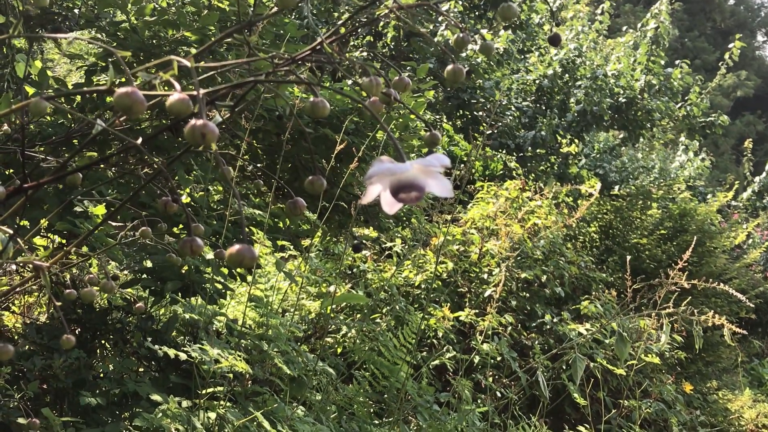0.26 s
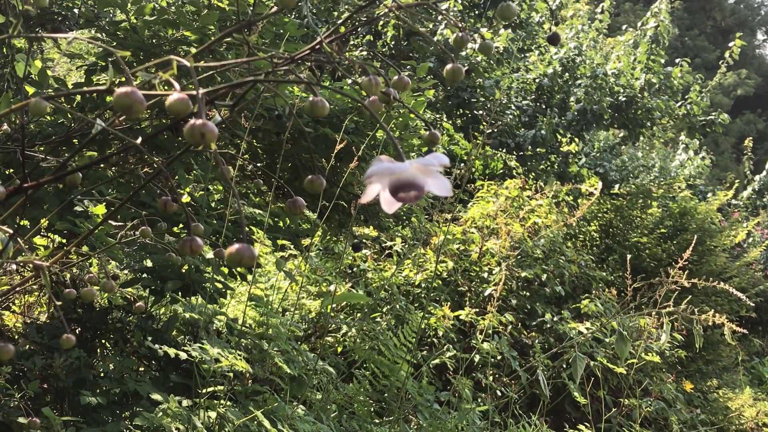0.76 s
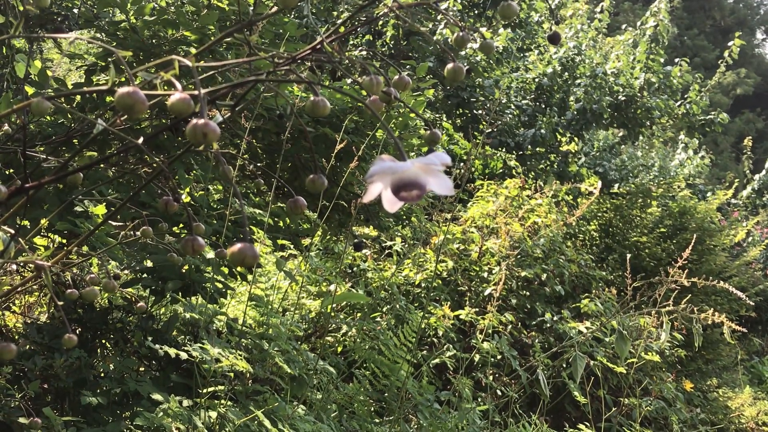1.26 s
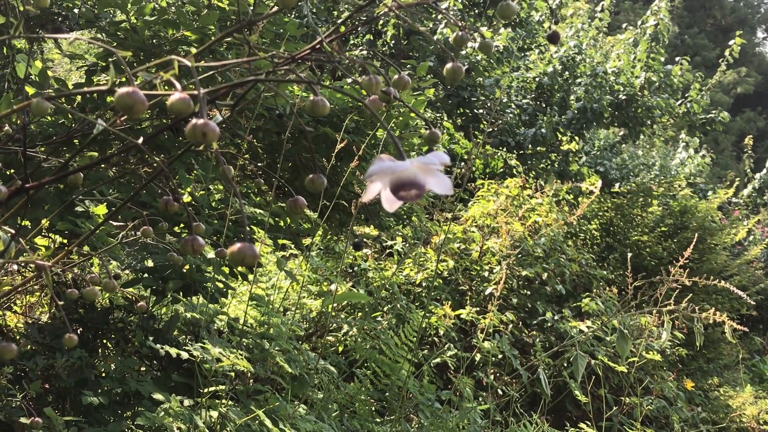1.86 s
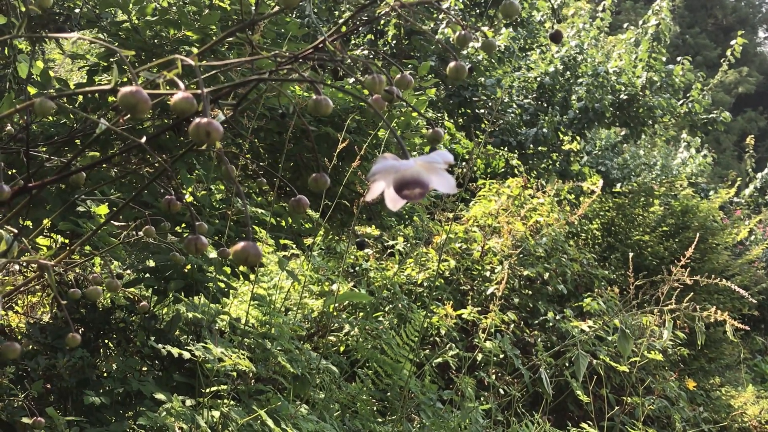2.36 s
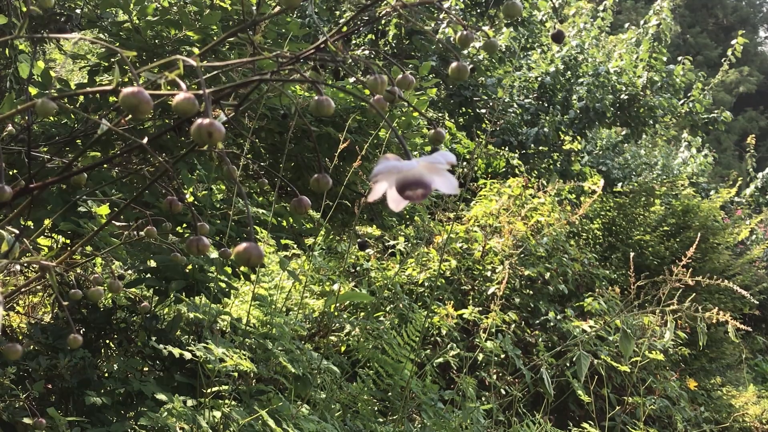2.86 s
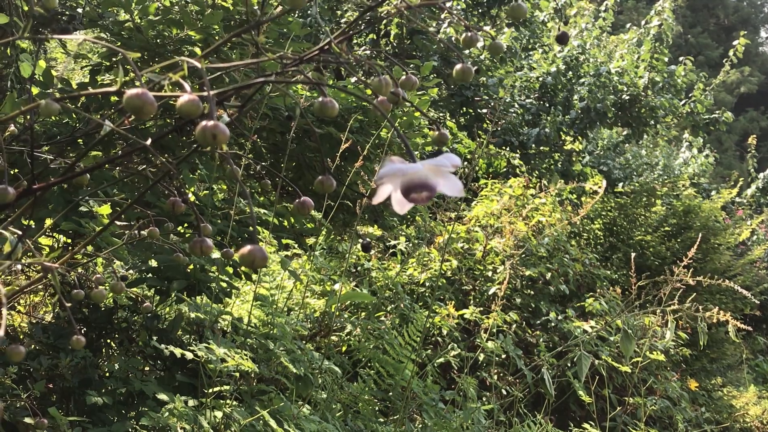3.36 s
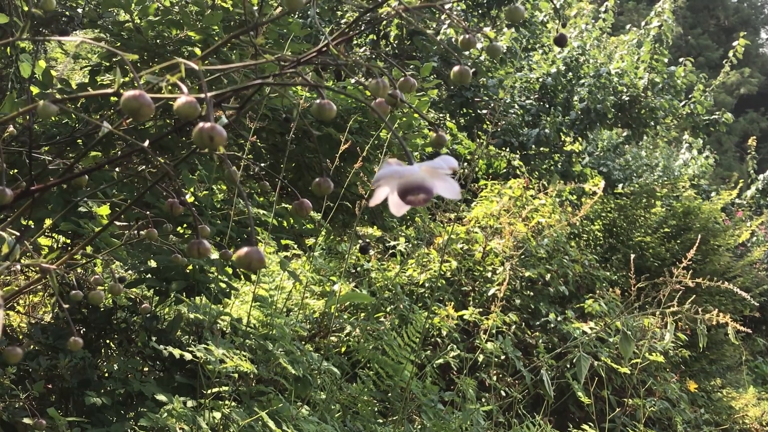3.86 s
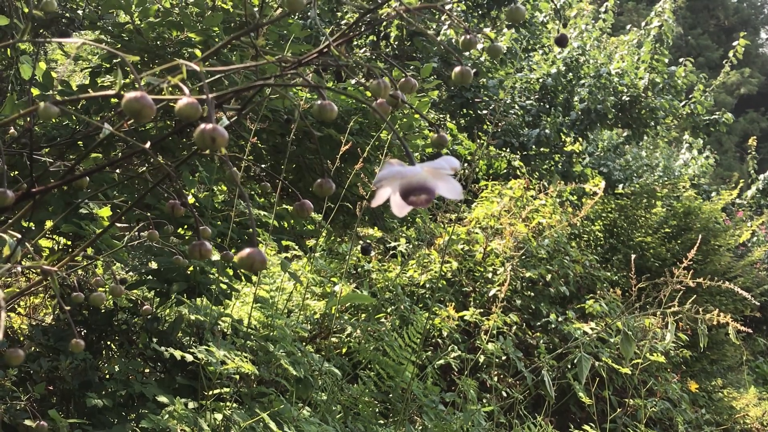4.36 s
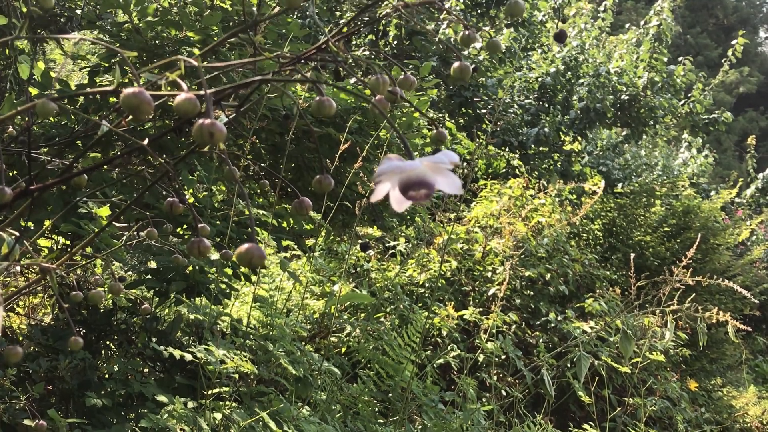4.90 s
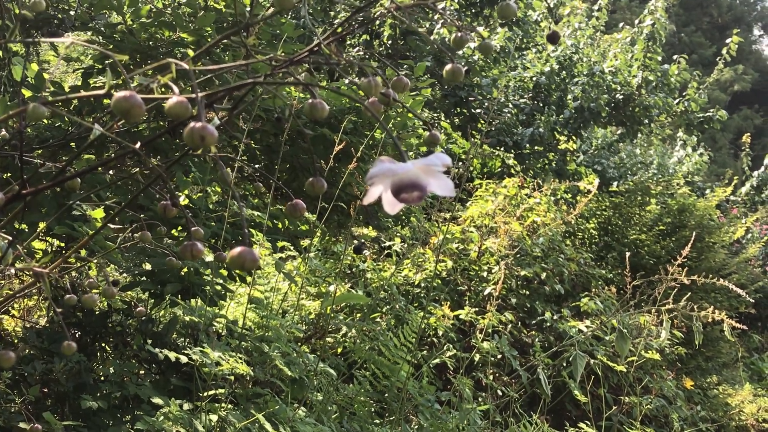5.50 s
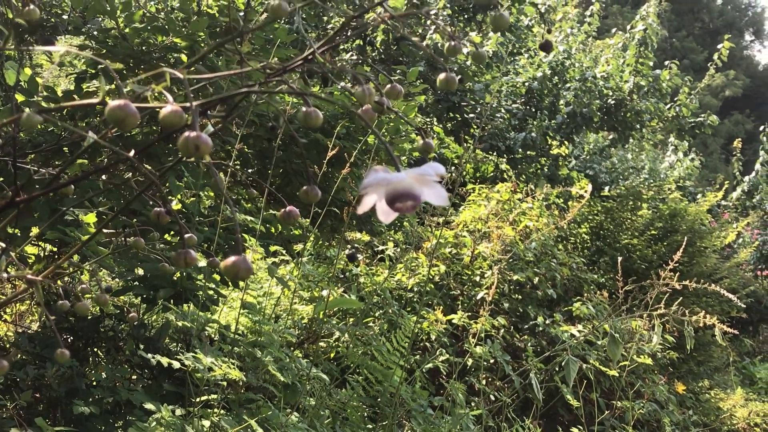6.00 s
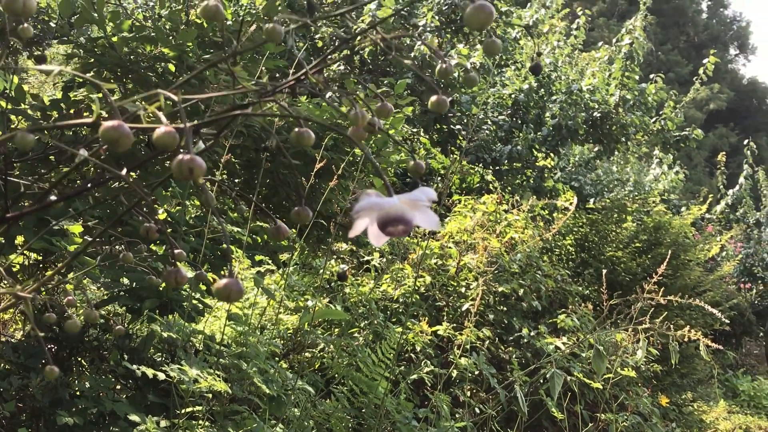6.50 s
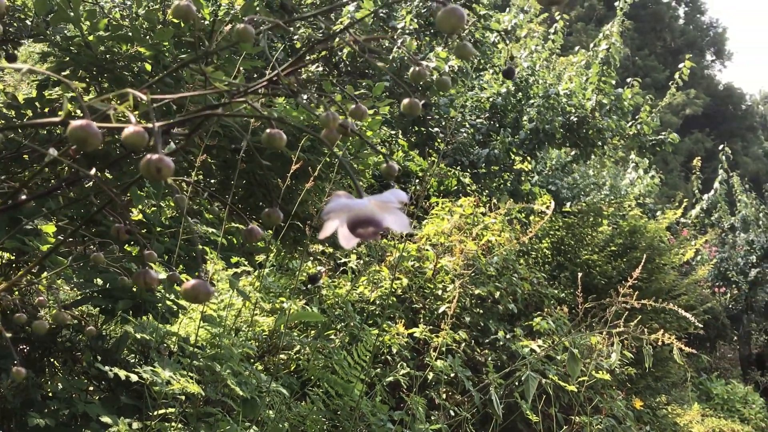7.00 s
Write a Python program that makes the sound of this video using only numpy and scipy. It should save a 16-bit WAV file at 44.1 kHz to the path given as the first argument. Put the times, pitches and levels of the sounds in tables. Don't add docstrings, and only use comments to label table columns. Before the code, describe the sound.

A dense, steady high chorus of cicadas fills a summer garden, with short insect rasps and a small bird's repeated rising whistle.

```python
import sys
import numpy as np
from scipy import signal
from scipy.fft import rfft, irfft
from scipy.io import wavfile

SR = 44100
rng = np.random.default_rng(int(sys.argv[2]) if len(sys.argv) > 2 else 0)


def rack_gain(trim_db):
    fader = np.asarray(trim_db, float)
    return 10 ** (fader / 20)


def output_pcm(signal):
    pcm = np.clip(np.atleast_2d(signal).T, -1, 1) * 32767
    wavfile.write(sys.argv[1], SR, np.round(pcm).astype(np.int16))


N = 319725


def rms_one(x):
    return x / np.sqrt(np.mean(x ** 2) + 1e-20)


def noise():
    return rng.standard_normal(N)


def in_time(rows):
    s, *columns, level_db = np.transpose(rows)
    t = np.arange(N) / SR
    gain = rack_gain(np.interp(t, s, level_db, left=-200, right=-200))
    return [np.interp(t, s, c) for c in columns] + [gain]


def at_hz(points, hz):
    points_hz, points_db = np.transpose(points)
    return np.interp(np.log(hz + 1), np.log(points_hz), points_db)


def colour(x, spectrum):
    hz = np.arange(N // 2 + 1) * SR / N
    return rms_one(irfft(rfft(x) * rack_gain(at_hz(spectrum, hz)), N))


def band(x, low_hz, high_hz):
    hz = np.arange(N // 2 + 1) * SR / N
    return irfft(rfft(x) * ((hz > low_hz) & (hz < high_hz)), N)


def drift(rate_hz):
    r = np.exp(-40 * np.pi * rate_hz / SR)
    draws = rng.standard_normal(N // 20 + 4002)
    slow = signal.lfilter([1], [1, -2 * r, r * r], draws)[4000:]
    return np.interp(np.arange(N) / 20, np.arange(len(slow)), rms_one(slow))


def clicks(rate_hz, uneven, waver):
    first_turn = rng.random()
    cycles = np.cumsum(rate_hz * (1 + waver * drift(3))) / SR
    turns = np.floor(first_turn + cycles)
    return np.diff(turns, prepend=turns[0]) * (1 + uneven * noise())


def tone(hz, gain):
    return np.sqrt(2) * gain * np.sin(2 * np.pi * np.cumsum(hz) / SR)


def hoarse(rate_hz, share):
    return 1 - share + share * drift(rate_hz)


def add(out, start_s, sound):
    i = round(start_s * SR)
    out[i:i + len(sound)] += sound[:N - i]


def crowd(spectrum, low_hz, high_hz, uneven, blur, count):
    rates = rng.uniform(low_hz, high_hz, count)
    singers = sum(clicks(hz, uneven, waver=.004) * rack_gain(2.0 * drift(0.68)) for hz in rates)
    return colour(rms_one(singers - singers.mean()) + blur * noise(), spectrum)


# (time [s], upper crowd level [dB], lower crowd level [dB])
CHORUS = [
    (0.0, -39.5, -45.5),
    (1.35, -40, -45.5),
    (2.24, -40.5, -44),
    (4.1, -41.5, -44),
    (4.8, -41, -43.5),
    (5.4, -39.5, -47.5),
    (6.5, -39, -44.5),
    (7.25, -40.5, -42.5),
]
# (frequency [Hz], density [dB per Hz])
UPPER = [(5000, -52), (7000, -24), (7700, -7), (8400, -3), (8900, -4.5), (9500, -10.5), (10000, -17.5),
         (10400, -23), (12000, -79)]
LOWER = [(3500, -42), (4800, -34.5), (5300, -14), (5750, -8), (6050, -2.5), (6700, 0.5), (7300, 5.5),
         (7800, -20), (8500, 2), (11000, -69)]


def chorus():
    s, upper_db, lower_db = np.transpose(CHORUS)
    upper_gain = in_time(np.transpose([s, upper_db + 1.0]))[0]
    lower_gain = in_time(np.transpose([s, lower_db - 1.0]))[0]
    upper = upper_gain * crowd(UPPER, 430, 500, uneven=0.55, blur=1.3, count=12)
    lower = lower_gain * crowd(LOWER, 400, 660, uneven=0.58, blur=1.0, count=8)
    return upper + lower


# (frequency [Hz], density [dB per Hz])
AIR = [(15, -43), (25, 2), (71, 0), (118, -4.5), (165, -7), (510, -17.5), (1710, -21.5), (2400, -20),
       (3040, -21), (4000, -20.5), (5200, -44), (8800, -120)]
HISS = [(3000, -33), (4500, 3.5), (10000, -2.5), (11000, 6), (12000, 2), (13500, 1.5), (15000, -9.5),
        (17200, -5), (19000, -46)]


def air():
    return rack_gain(-64) * colour(noise(), AIR) + rack_gain(-59.5) * colour(noise(), HISS)


def bursts(events, length_s):
    marks = np.zeros(N)
    for s, level_db in events:
        marks[min(round(s * SR), N - 1)] = rack_gain(level_db)
    return signal.oaconvolve(marks, np.hanning(round(length_s * SR)), "same")


# (time [s], firing rate [Hz], level [dB])
ENGINE_LEAVING = [
    (0, 51.9, -65.5),
    (.35, 57.6, -62.5),
    (.7, 44.8, -66.5),
    (1.3, 46.3, -76),
    (1.6, 45, -85),
]
ENGINE_COMING = [
    (5.7, 52, -92),
    (5.9, 56.3, -65),
    (6.3, 60.8, -64),
    (6.7, 65.5, -58.5),
    (7.25, 70.7, -63),
]
ENGINE_REVVING = [
    (4.6, 62, -74),
    (5.0, 68, -69.5),
    (5.6, 88.5, -67.5),
    (5.75, 92.2, -85),
]
ENGINE_WHINE = [
    (5.5, 180.5, -97),
    (5.699, 190, -77.5),
    (6.2, 231.3, -74),
    (6.35, 233, -90),
]
# (middle [s], level [dB])
HUM_SWELLS = [(0.0, -66.5), (.72, -68.5), (1.9, -73), (2.8, -73.5), (3.2, -69), (3.67, -73.5),
              (4.12, -75.5), (4.78, -70), (5.4, -65), (5.8, -70), (6.15, -68.5), (6.7, -70.5), (7.05, -75)]


def traffic():
    hum_gain = rack_gain(-81.5) + bursts(HUM_SWELLS, length_s=0.59)
    voices = [(111.5, hum_gain)]
    for engine in (ENGINE_LEAVING, ENGINE_COMING, ENGINE_REVVING, ENGINE_WHINE):
        voices.append(in_time(engine))
    out = np.zeros(N)
    for hz, gain in voices:
        out += tone(hz * (1 + 0.0181 * drift(4.26)), gain * rack_gain(1.4 * drift(4.7)))
    return out


def rasps(events, length_s, rate_hz, body_hz, width_hz, lift_db):
    edges_hz = [body_hz - width_hz / 2, body_hz + width_hz / 2]
    body = signal.butter(3, edges_hz, "band", fs=SR, output="sos")
    tymbals = clicks(rate_hz, 0.31, waver=0.015) + clicks(rate_hz * 1.9, 0.14, waver=.02)
    drive = rms_one(tymbals) + 0.53 * noise()
    return rack_gain(lift_db) * bursts(events, length_s) * rms_one(signal.sosfilt(body, drive))


# (middle [s], level [dB])
LOW_RASPS = [(0.017, -36), (0.138, -38), (0.507, -35), (1.007, -33.5), (1.456, -40), (1.822, -41),
             (2.183, -40), (2.586, -41), (2.852, -38), (3.186, -42), (3.849, -35), (4.426, -32.5),
             (4.682, -34.5), (5.013, -36), (5.292, -34.5), (5.663, -35), (5.947, -36), (6.222, -33.5),
             (6.554, -32.5), (6.836, -32), (7.059, -33)]


def low_rasps():
    return rasps(LOW_RASPS, 0.05, 190, body_hz=6580, width_hz=1630, lift_db=-8.5)


def trill():
    k = np.arange(35)
    first_s, gap_s, slowing_s = .04, .0576, .00064
    s = first_s + gap_s * k + slowing_s * k ** 2 / 2
    level_db = -65 - .1 * k + rng.standard_normal(len(k))
    return rasps(np.transpose([s, level_db]), 0.031, 142, body_hz=4500, width_hz=630, lift_db=3.5)


# (first [s], last [s], level [dB])
CHIP_RUNS = [
    (.183, .534, -73),
    (.722, .881, -75),
    (1.365, 1.555, -73),
    (1.813, 2.245, -72.5),
    (2.869, 2.869, -69),
    (3.103, 3.526, -72),
    (4.194, 4.79, -71),
    (5.372, 5.957, -70),
    (6.613, 7.195, -70.5),
]


def chips():
    gap_s, chip_s, lift_db, uneven_db = .085, .023, 2.5, 1.4
    out, size = np.zeros(N), round(chip_s * SR)
    chip = tone(np.geomspace(1750, 3150, size), signal.windows.tukey(size, .6))
    for first, last, level_db in CHIP_RUNS:
        for middle in np.linspace(first, last, round((last - first) / gap_s) + 1):
            strength_db = level_db + lift_db + uneven_db * rng.standard_normal()
            add(out, middle - chip_s / 2, rack_gain(strength_db) * chip)
    return out * hoarse(160, share=.3)


# (middle [s], level [dB])
HIGH_RASPS = [(0.419, -53), (0.49, -49), (0.87, -50), (0.981, -50), (1.31, -51), (1.509, -44.5),
              (1.741, -49.5), (2.156, -52), (2.575, -44.5), (3.399, -45.5), (3.809, -50.5), (3.861, -49.5),
              (4.204, -50), (4.554, -43.5), (4.894, -52), (5.07, -44.5), (5.253, -50), (5.613, -42),
              (5.664, -50), (6.05, -50), (6.213, -52), (6.323, -43), (6.472, -53), (6.863, -44),
              (7.247, -48.5)]


def high_rasps():
    return rasps(HIGH_RASPS, 0.077, 210, body_hz=7060, width_hz=1140, lift_db=6.5)


# (time [s], click rate [Hz], level [dB])
WINDER = [
    (.5, 610, -75),
    (1.0, 624, -60),
    (1.5, 648, -58),
    (1.9, 662, -57.5),
    (2.25, 671, -57),
    (2.7, 677.5, -54.5),
    (4.3, 677.8, -54.5),
    (4.92, 681, -54.5),
    (4.97, 681, -95),
]
# (multiple of click rate, level [dB])
WINDER_LINES = [(7, -14), (7.84, -10), (8, -1), (8.05, -10), (8.15, -12), (8.68, -9), (8.84, -1), (9, -1),
                (9.15, -4), (9.78, -4), (10.48, -4)]
# (multiple of click rate, width [Hz], level [dB])
WINDER_HAZE = [(7.0, 47, -27), (8.1, 72, -3.5), (9.05, 77, 2), (9.7, 110, 1)]


def winder():
    hz, gain = in_time(WINDER)
    rest_hz, open_hz = 610, 673
    effort = np.clip((hz - rest_hz) / (open_hz - rest_hz), 0, 1)
    opening = rack_gain(-28 * (1 - effort ** 1.8))
    phase = 2 * np.pi * np.cumsum(hz * (1 + .0003 * drift(8))) / SR
    lines, haze = np.zeros((2, N))
    for k, level_db in WINDER_LINES:
        body = opening if k < 8.5 else 1
        lines += rack_gain(level_db + 1.2 * drift(14)) * body * np.sin(k * phase)
    for k, width_hz, level_db in WINDER_HAZE:
        body = opening if k < 8.5 else 1
        haze += rack_gain(level_db) * drift(width_hz) * body * np.sin(k * phase)
    return gain * (rack_gain(-.5) * lines + rack_gain(-1.5) * haze)


# (start [s], length [s], pitch [Hz], level [dB])
NOTES = [(.95, .045, 3240, -70), (.99, .04, 3750, -73), (1.085, .05, 3250, -71), (1.3, .12, 3900, -71),
         (1.515, .05, 3100, -70), (1.69, .06, 2370, -71), (1.88, .07, 2920, -74), (2.03, .05, 2680, -75),
         (2.38, .045, 3150, -71), (2.4, .09, 3590, -74), (2.425, .045, 1960, -66), (2.57, .05, 1450, -72),
         (2.625, .04, 1260, -74), (2.59, .025, 3440, -69), (2.6, .045, 4230, -66), (2.62, .08, 3830, -68),
         (2.64, .03, 3450, -72), (2.85, .04, 2680, -72), (3.075, .03, 2890, -70), (3.42, .05, 3490, -73),
         (3.88, .085, 3880, -73), (4.04, .03, 4050, -74), (4.65, .05, 4480, -68), (4.925, .03, 3220, -71),
         (5.11, .09, 3870, -72), (5.595, .055, 4250, -66), (5.66, .04, 4280, -65), (5.72, .03, 4200, -67),
         (5.63, .17, 910, -82), (6.31, .05, 3900, -69)]


def bird_notes():
    out = np.zeros(N)
    for start, length, hz, level_db in NOTES:
        size = round(length * SR)
        pitch = hz * (1 - 0.014 * np.linspace(-.5, .5, size))
        add(out, start, tone(pitch, rack_gain(level_db) * signal.windows.tukey(size, .4)))
    return rack_gain(2) * out * hoarse(200, share=.45)


# (end [s], level [dB])
WHISTLES = [
    (1.227, -62),
    (2.525, -62.5),
    (3.808, -62.5),
    (5.051, -62.5),
    (6.232, -62.5),
]


def whistles():
    length_s, flick_s = .19, .018
    t = np.arange(0, length_s, 1 / SR)
    left = length_s - t
    flick = np.exp(-left / flick_s)
    pitch = 1462 + 3100 * t + 1475 * flick
    swell_db = -18 * np.clip(1 - t / .13, 0, 1) + 5 * flick
    shape = rack_gain(swell_db) * np.clip(left / .006, 0, 1)
    throat = rack_gain(-3.5) * np.exp(-.5 * ((left - 0.079) / 0.033) ** 2)
    out, octave = np.zeros((2, N))
    for end, level_db in WHISTLES:
        add(out, end - length_s, tone(pitch, rack_gain(level_db) * shape))
        add(octave, end - length_s, tone(2 * pitch, rack_gain(level_db) * throat))
    return out * hoarse(160, share=.3) + octave * hoarse(200, share=.6)


def hoots():
    first_s, gap_s, length_s = 1.706, .146, .108
    out, size = np.zeros(N), round(length_s * SR)
    for k in range(6):
        level_db = -72.5 - (k - 2.0) ** 2
        gain = rack_gain(level_db) * signal.windows.tukey(size, .3)
        add(out, first_s + k * gap_s, tone(np.full(size, 1008 - k * 4.5), gain))
    return out


# (time [s], click rate [Hz], overtones above the body [dB], level [dB])
BUZZER = [
    (4.95, 441, 0, -80),
    (5.05, 441, 0, -56),
    (5.25, 440.8, 0, -46.5),
    (5.9, 439.9, 0, -46),
    (6.35, 440, 0, -46),
    (6.6, 440.5, -8, -48),
    (7.25, 441, -9, -50),
]
# (frequency [Hz], level [dB])
BUZZER_BODY = [(6500, -34), (8250, -28), (8800, 5), (9300, 10.5), (9700, 11), (10150, 1), (10600, -6),
               (11450, -8), (12500, -15), (13700, -10), (15400, -21), (17000, -45)]
BUZZER_NULLS = (24, 27, 32, 34, 35)


def buzzer():
    hz, overtones_db, gain = in_time(BUZZER)
    phase = 2 * np.pi * np.cumsum(hz * (1 + .0003 * drift(6))) / SR
    flutter = [rack_gain(2.0 * drift(5)) for _ in range(3)]
    lines = np.zeros(N)
    for k in range(16, 37):
        level_db = at_hz(BUZZER_BODY, 440 * k) + 3 * (k > 24) - 6 * (k in BUZZER_NULLS)
        lines += rack_gain(level_db) * flutter[k % 3] * np.cos(k * phase)
    puffs = colour(noise() * np.exp(1.1 * np.cos(phase)), BUZZER_BODY)
    ribs = 1 + .8 * np.cos(phase / 4)
    song = rack_gain(-.5) * rms_one(lines * ribs) + rack_gain(-3.5) * puffs
    overtones = band(song, 10300, 20000)
    return rack_gain(-1.5) * gain * (song + (rack_gain(overtones_db) - 1) * overtones)


def garden(x):
    t = np.arange(round(.4 * SR)) / SR
    t60_s, build_up_s = 0.41, 0.0016
    scatter = rng.standard_normal(len(t)) * rack_gain(-60 * t / t60_s) * (1 - np.exp(-t / build_up_s))
    scatter /= np.sqrt(np.sum(scatter ** 2))
    out = x + rack_gain(-2.5) * signal.oaconvolve(x, scatter)[:N]
    add(out, .024, rack_gain(-14) * x)
    return out


def scene():
    short_songs = high_rasps() + low_rasps() + trill()
    birds = garden(whistles() + chips() + bird_notes()) + hoots()
    long_songs = chorus() + winder() + buzzer()
    return (birds + short_songs + long_songs + traffic() + air())[None]


def top_cut(x):
    return signal.sosfilt(signal.butter(12, 17130, fs=SR, output="sos"), x)


def record(dry):
    vent = signal.butter(2, 33, "high", fs=SR, output="sos")
    return top_cut(signal.sosfilt(vent, dry))


dry = scene()
out = record(dry)
output_pcm(out)
```